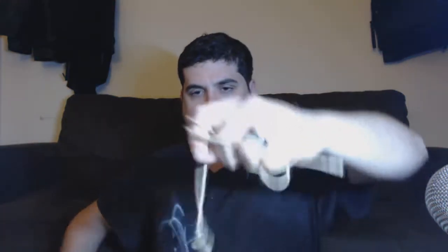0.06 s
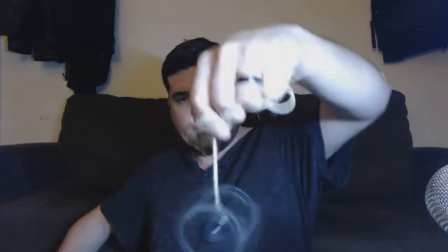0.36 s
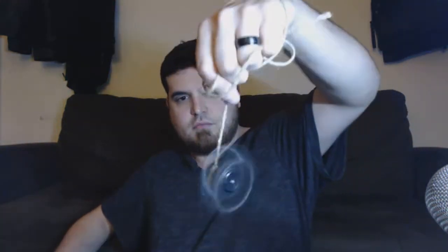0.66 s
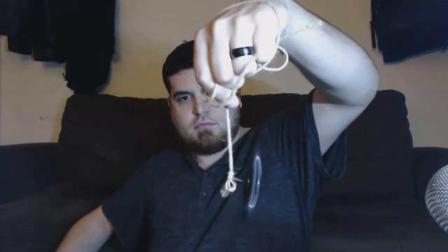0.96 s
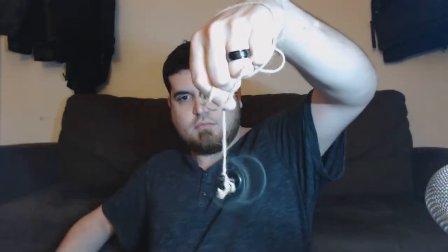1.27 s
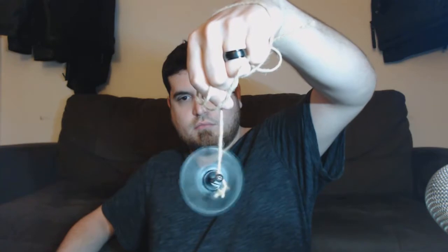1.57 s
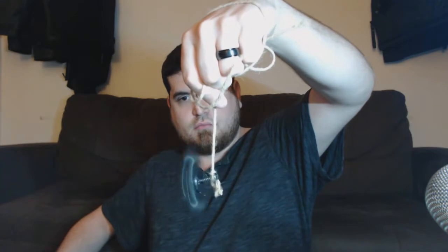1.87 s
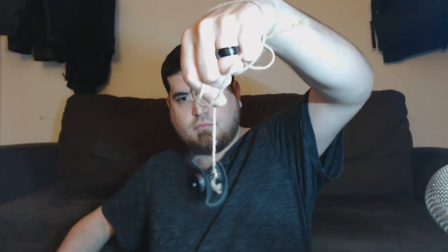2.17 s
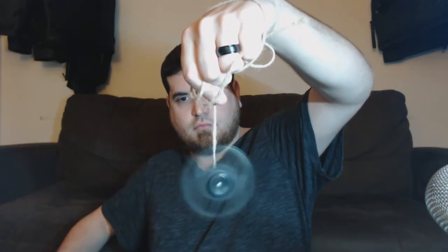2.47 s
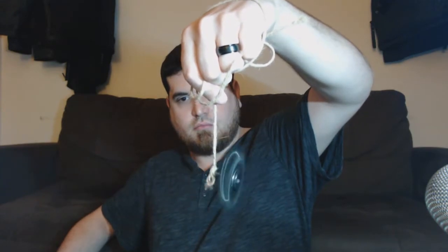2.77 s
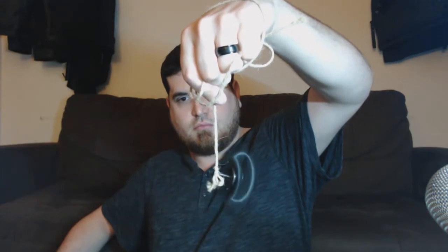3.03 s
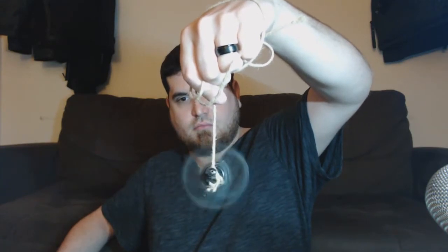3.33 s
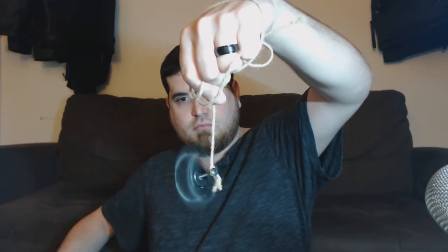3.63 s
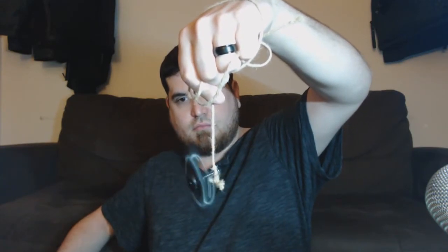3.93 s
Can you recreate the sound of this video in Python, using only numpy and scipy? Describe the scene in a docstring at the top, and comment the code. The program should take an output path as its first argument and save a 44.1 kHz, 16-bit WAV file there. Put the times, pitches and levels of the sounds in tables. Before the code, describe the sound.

A fidget spinner spins fast on a string close to the microphone, its dry bearing giving a bright, fluttering hiss and ring. It rattles harder twice and slows slightly, over a low machine hum in a quiet room.

```python
"""A bright, fluttering hiss and ring, close to the microphone: a fidget spinner on a string, spinning
fast and slowly losing speed. Countless tiny impacts in its dry ball bearing ring the race, cage, balls,
rotor and frame, pulsing with every turn. It rattles harder as it twists on the string; balls knock and
grit ticks. Behind it, machines hum low in a quiet room."""
import sys
import numpy as np
from scipy import signal
from scipy.fft import rfft, irfft, next_fast_len
from scipy.io import wavfile
from scipy.ndimage import map_coordinates

SR = 44100
rng = np.random.default_rng(int(sys.argv[2]) if len(sys.argv) > 2 else 0)


def waveform_to_disk(signal):
    """Save audio, clipped to [-1, 1], as 16-bit WAV at the path in sys.argv[1]."""
    frames = np.transpose(np.atleast_2d(signal))
    scaled = np.clip(frames, -1, 1) * 32767
    samples = np.round(scaled).astype(np.int16)
    wavfile.write(sys.argv[1], SR, samples)


N = 176400
TIME_S = np.arange(N) / SR

# how hard the balls rattle, as the level of the race's ring: time_s, level_db
RATTLE = [(0, -60), (0.12, -53), (0.22, -56), (0.45, -52.5), (0.63, -49), (0.69, -51), (0.74, -47),
          (0.88, -45.5), (1.18, -51), (1.3, -57), (1.72, -53), (2.25, -55.5), (2.6, -51), (2.75, -50.5),
          (2.92, -49), (3.25, -57), (3.58, -55.5), (4, -58)]
# the ring's pitch as the spinner twists; modes follow its ratio to the mean: time_s, pitch_hz
TWIST_PITCH = [(0, 6000), (.25, 6420), (.62, 6100), (.78, 6450), (1.25, 6250), (1.7, 6330), (2.3, 6623),
               (2.65, 6440), (2.95, 6270), (3.3, 6220), (4, 6360)]
# rhythms of the turn, its two tight spots, the cage, the passing balls: depth_db, first_peak_turns
FLUTTER = [(1, 0.68), (0.98, 0.37), (0.48, 0.048), (0.86, 0.2)]


def ball_load(chatter_db, rattle_chatter):
    """Load on the balls in dB: rhythms tied to the turning plus chatter, deeper when they rattle."""
    beats_per_turn = [1, 2, 1.375, 4.333]  # rate of each FLUTTER rhythm: beats_per_turn
    flutter_db = sum(db * np.cos(2 * np.pi * beats * (turns() - first_peak))
                     for beats, (db, first_peak) in zip(beats_per_turn, FLUTTER))
    rattle_db = curve(RATTLE)
    depth = amp(rattle_chatter * (rattle_db - rattle_db.mean()))
    return (flutter_db + chatter_db * wobble(260)) * depth


def race_ring(load_db):
    """The balls strike the race they roll in: the main ring."""
    race_modes = [(6331, 370, -5.5, 1), (6770, 270, -22.5, 3)]  # race resonances: pitch_hz, width_hz, relative_db, throb_db
    return amp(curve(RATTLE)) * modes(race_modes, load_db, drift=0.85, stray=0.004)


def cage_ring(load_db):
    """The cage that holds the balls rings just above the race."""
    cage_modes = [(7100, 380, 2, -6), (7590, 280, 2, 2.5), (8180, 360, -5.5, 2)]  # cage resonances: pitch_hz, width_hz, relative_db, throb_db
    swell = [(0, -58), (0.1, -58.5), (0.22, -57), (0.5, -62), (0.7, -59), (0.85, -56.5), (1.1, -59),
             (1.35, -61), (1.65, -58), (2.15, -59), (2.5, -62), (2.7, -59.5), (2.95, -59), (3.25, -66),
             (3.6, -58.5), (4, -60)]  # strength of the ring: time_s, level_db
    return amp(curve(swell)) * modes(cage_modes, load_db, drift=0.44, stray=0.008)


def rotor_ring(load_db):
    """The impacts ring the rotor, well below the race."""
    rotor_modes = [(3540, 260, -5.5, 2), (4002, 265, 3.5, 4)]  # rotor resonances: pitch_hz, width_hz, relative_db, throb_db
    swell = [(0, -73), (.1, -74), (.15, -64.5), (.23, -67.5), (.28, -106), (.34, -68), (.43, -71),
             (.6, -63), (.87, -68.5), (1.25, -76.5), (1.65, -65.5), (1.9, -65), (2.1, -69), (2.38, -69),
             (2.6, -67.5), (2.85, -68), (3.22, -76), (3.5, -68), (3.7, -67), (4, -80)]  # strength of the ring: time_s, relative_db
    return amp(curve(swell) - 0.5) * modes(rotor_modes, load_db, drift=0.24, stray=0.0048)


def frame_ring(load_db):
    """The impacts ring the frame, whose pitch follows the twist in full."""
    frame_modes = [(4798, 270, -1, -2.5), (5460, 180, 0.5, -2.5)]  # frame resonances: pitch_hz, width_hz, relative_db, throb_db
    swell = [(0, -74), (.13, -72), (.21, -62), (.27, -59), (.35, -65.5), (.6, -65.5), (.98, -60),
             (1.2, -69), (1.45, -73), (1.62, -63.5), (1.9, -65), (2.25, -68.5), (2.4, -65), (2.6, -64.5),
             (2.9, -65), (3.25, -73), (3.6, -69), (4, -71)]  # strength of the ring: time_s, relative_db
    return amp(curve(swell) - 2.5) * modes(frame_modes, load_db, drift=1.0, stray=0.011)


def ball_ring(load_db):
    """The balls themselves ring, high and bright."""
    ball_modes = [(9810, 610, -1, 2), (14300, 850, -15.5, 3.5)]  # ball resonances: pitch_hz, width_hz, relative_db, throb_db
    swell = [(0, -68), (.22, -69), (.35, -60), (.47, -68), (.62, -61.5), (.85, -63), (1, -67), (1.28, -66),
             (1.6, -67), (1.85, -69.5), (2.1, -67.5), (2.48, -64.5), (2.85, -67), (3.2, -65), (3.6, -71),
             (4, -70)]  # strength of the ring: time_s, relative_db
    return amp(curve(swell) + 0.5) * modes(ball_modes, load_db, drift=0, stray=0.005)


def shimmer(load_db, twist_s=1.918, lobe_db=2.5, first_lobe_s=0.25, fade_db_per_s=0.75):
    """A fading shimmer beams out in four lobes that sweep past the microphone as the spinner twists."""
    shimmer_modes = [(11540, 1380, 0, -0.6)]  # broad resonance: pitch_hz, width_hz, relative_db, throb_db
    beam_db = lobe_db * np.cos(2 * np.pi * 4 * (TIME_S - first_lobe_s) / twist_s)
    level_db = -63.5 + beam_db - fade_db_per_s * TIME_S
    return amp(level_db) * modes(shimmer_modes, load_db, drift=0, stray=0.005)


def rolling_hiss(load_db):
    """The dry balls roll and tap: a broad treble hiss."""
    colour = [(4500, -22.5), (6000, -6.5), (7300, -8.5), (8900, 0), (10000, -8.5), (11500, -2.5),
              (12700, 1), (14000, -1.5), (15700, -1)]  # spectrum of the hiss: frequency_hz, relative_db
    swell = [(0, -71), (.15, -72), (.22, -61), (.35, -60), (.5, -67), (.65, -66), (1, -64.5), (1.4, -65),
             (1.7, -66.5), (2, -69), (2.45, -67), (2.7, -65.5), (2.9, -66), (3.1, -68), (3.5, -71.5),
             (4, -68)]  # strength of the hiss: time_s, relative_db
    return amp(curve(swell) + 4.5) * coloured(impacts(rolling_db=-6.5) * amp(load_db), colour)


def frame_rush(load_db):
    """The rolling sounds through the frame as a duller rush."""
    colour = [(400, -20), (1000, -15), (2200, -17), (3000, -6), (3700, 1), (4400, -0.5), (5600, 0.5),
              (6500, -3.5), (8000, -28.5)]  # spectrum of the rush: frequency_hz, relative_db
    swell = [(0, -65), (0.12, -68.5), (0.22, -61.5), (0.45, -64.5), (0.65, -63.5), (0.88, -64),
             (1.3, -64.5), (1.7, -68), (2.1, -66), (2.4, -64), (2.8, -64.5), (3.2, -69.5), (3.65, -68),
             (4, -65.5)]  # strength of the rush: time_s, relative_db
    return amp(curve(swell) - 2.5) * coloured(impacts(rolling_db=-0.5) * amp(load_db), colour)


def chirps(load_db, centre_hz=6980, fall_hz_per_turn=1100, peak_turns=0.27, half_width_turns=0.29):
    """When the balls rattle hard, one ring slides down in pitch once every turn."""
    from_peak = (turns() - peak_turns + 0.5) % 1 - 0.5
    rattle_db = curve(RATTLE)
    level_db = -51.5 + 2 * (rattle_db - rattle_db.max())
    drive = impacts(rolling_db=2) * amp(load_db) * np.exp(-(from_peak / half_width_turns) ** 2)
    return amp(level_db) * ringing(drive, centre_hz - fall_hz_per_turn * from_peak, width_hz=160)


def low_ring():
    """A lower, rattly ring swells and fades, and drops out briefly several times."""
    low_modes = [(2780, 370, 0, 1)]  # low resonance: pitch_hz, width_hz, relative_db, throb_db
    swell = [(0, -86), (.07, -72), (.13, -94), (.23, -71), (.28, -97), (.34, -72), (.43, -86), (.54, -69),
             (.62, -74), (.7, -77.5), (.8, -88), (2.05, -93), (2.2, -78), (2.3, -85), (2.43, -102),
             (2.52, -80), (2.85, -92), (3.1, -82), (3.6, -89), (4, -83)]  # strength of the ring: time_s, level_db
    return amp(curve(swell)) * modes(low_modes, load_db=0, drift=0.15, stray=0.029)


def knocks():
    """A ball knocks in its cage and rings one rough note for a few milliseconds."""
    strikes = [(0.621, -32, 6270), (0.731, -27.5, 6420), (.773, -32, 6340), (.837, -32, 6370),
               (.884, -46, 6450), (.941, -40, 6310), (1.091, -33.5, 6210), (2.563, -29.5, 6530),
               (2.619, -30.5, 6500), (2.698, -31.5, 6480), (2.760, -34, 6350), (2.800, -36, 7140),
               (2.838, -34, 6270), (2.881, -31, 6240), (2.932, -34, 6270), (2.995, -40, 6310),
               (3.874, -36.5, 6440)]  # harder strikes: peak_s, relative_db, pitch_hz
    out = np.zeros(N)
    for peak_s, db, hz in strikes:
        envelope = amp(db - 5) * spike(peak_s, rise_s=0.0015, fall_s=0.003)
        out += envelope * np.sin(2 * np.pi * hz * TIME_S + 0.8 * wobble(900))
    return out


def grit_ticks():
    """Grit in the race makes small dry ticks."""
    ticks = [(.191, -49), (1.361, -51), (1.599, -43), (2.445, -49), (3.186, -47), (3.875, -43)]  # grains caught in the race: peak_s, level_db
    colour = [(1000, -32), (2500, -25), (4000, -11), (5600, -7), (6600, 12), (7600, -2), (8900, -9),
              (9800, 2), (11600, -14), (15000, -9)]  # spectrum of a tick: frequency_hz, relative_db
    envelope = sum(amp(db) * spike(peak_s, rise_s=0.0005, fall_s=0.0035) for peak_s, db in ticks)
    return envelope * coloured(rng.standard_normal(N), colour)


def blip(peak_s=1.655, half_width_s=0.018, pitch_hz=534, level_db=-71):
    """One faint, short hollow note."""
    envelope = amp(level_db) * np.exp(-((TIME_S - peak_s) / half_width_s) ** 2)
    return envelope * np.sin(2 * np.pi * pitch_hz * TIME_S)


def machine_hum(waver_hz=59.1, unsteady_rad=0.14):
    """Machines hum low in the room; one tone wavers in level."""
    steady = [(90.5, -56.5), (120.5, -72), (79.4, -71.5), (265, -80.5), (17, -75)]  # steady tones: pitch_hz, level_db
    waver = [(0.0, -57), (0.04, -54.5), (1.12, -60.5), (1.47, -70), (1.51, -63), (2.51, -53.5),
             (3.56, -58.5), (3.69, -72), (4.0, -82)]  # strength of the wavering tone: time_s, relative_db

    def tone(hz):
        return np.sqrt(2) * np.sin(2 * np.pi * (hz * TIME_S + rng.random()) + unsteady_rad * wobble(13))
    return sum(amp(db) * tone(hz) for hz, db in steady) + amp(curve(waver) - 0.5) * tone(waver_hz)


def room_tone():
    """The soft rumble of the quiet room."""
    colour = [(15, -19), (25, 8), (31, 3.5), (38, -3.5), (55, 7), (72, -9.5), (110, 3.5), (135, -6),
              (185, -8), (202, -0.5), (216, -11.5), (275, -8.5), (293, -11), (304, -0.5), (320, -14),
              (420, -17), (550, -23), (900, -27.5), (2000, -31.5), (15000, -35.5)]  # spectrum of the rumble: frequency_hz, relative_db
    return amp(-63) * coloured(rng.standard_normal(N), colour)


def dipped(x, half_width_s=0.011, above_hz=334):
    """All but the bass dips for a moment now and then."""
    dips = [(0.12, 18), (0.269, 46), (0.284, 33), (0.425, 22), (.541, 14), (1.121, 15), (1.491, 16),
            (1.651, 15), (2.002, 18), (2.049, 15), (2.281, 19), (2.42, 11), (2.514, 12), (2.86, 23),
            (2.955, 10)]  # brief drops in level: centre_s, depth_db
    dip_db = sum(db * np.exp(-((TIME_S - centre_s) / half_width_s) ** 2) for centre_s, db in dips)
    bass = filtered(x, lambda hz: 1 / (1 + (hz / above_hz) ** 6))
    return bass + (x - bass) * amp(-dip_db)


def turns(start_hz=19.26, slowing_hz_per_s=0.9375):
    """Turns made so far by the slowing spinner."""
    return start_hz * TIME_S - slowing_hz_per_s * TIME_S ** 2 / 2


def impacts(rolling_db, hits_per_s=5500):
    """Tiny impacts of random size over smooth rolling noise."""
    hits = (rng.random(N) < hits_per_s / SR) * rng.standard_normal(N)
    return unit(unit(hits) + amp(rolling_db) * rng.standard_normal(N))


def modes(table, load_db, drift, stray):
    """Impacts ring each mode; it throbs once a turn, drifts in pitch with the twist and strays a little."""
    pitch = curve(TWIST_PITCH)
    throb = np.cos(2 * np.pi * (turns() - FLUTTER[0][1]))
    out = np.zeros(N)
    for hz, width_hz, db, throb_db in table:
        bend = 1 + drift * (pitch / pitch.mean() - 1) + stray * wobble(4.74)
        drive = impacts(rolling_db=-5.5) * amp(load_db + throb_db * throb)
        out += amp(db) * ringing(drive, hz * bend, width_hz)
    return unit(out)


def ringing(drive, hz, width_hz):
    """A resonance of moving pitch, at rms 1."""
    carrier = np.exp(2j * np.pi * np.cumsum(hz) / SR)
    pole = np.exp(-np.pi * width_hz / SR)
    envelope = signal.lfilter([1], np.poly([pole, pole]), drive / carrier)
    return unit((envelope * carrier).real)


def spike(peak_s, rise_s, fall_s):
    """An envelope that rises and falls exponentially."""
    return np.exp(-np.maximum((peak_s - TIME_S) / rise_s, (TIME_S - peak_s) / fall_s))


def amp(db):
    """Decibels to gain."""
    return 10 ** (np.asarray(db) / 20)


def unit(x):
    """Scale to rms 1."""
    return x / np.sqrt(np.mean(x ** 2) + 1e-20)


def curve(rows):
    """One value per sample from (time_s, value) points."""
    return np.interp(TIME_S, *np.transpose(rows))


def wobble(rate):
    """A smooth random curve, rate knots a second."""
    return map_coordinates(rng.standard_normal(int(N * rate / SR) + 4), [np.arange(N) * rate / SR])


def filtered(x, response):
    """x through a filter whose gain is response(hz)."""
    size = next_fast_len(N + SR // 2)
    return irfft(rfft(x, size) * response(np.fft.rfftfreq(size, 1 / SR)), size)[:N]


def coloured(x, points):
    """x shaped by (frequency_hz, relative_db) points, at rms 1."""
    points_hz, db = np.transpose(points)
    return unit(filtered(x, lambda hz: amp(np.interp(np.log(hz + 1), np.log(points_hz), db))))


def scene():
    """The spinner close to one microphone, the room behind it."""
    load_db = ball_load(chatter_db=2.5, rattle_chatter=0.06)
    ring_load_db, frame_load_db, bright_load_db = 0.6 * load_db, 0.58 * load_db, 0.66 * load_db
    treble_load_db = bright_load_db + 2.5 * wobble(90)  # the treble flickers
    rings = race_ring(ring_load_db) + cage_ring(ring_load_db)
    rings += rotor_ring(frame_load_db) + frame_ring(frame_load_db)
    rings += ball_ring(bright_load_db) + shimmer(treble_load_db)
    hiss = rolling_hiss(treble_load_db) + frame_rush(0.88 * load_db)
    rattles = chirps(ring_load_db) + low_ring() + knocks() + grit_ticks()
    room = machine_hum() + room_tone()
    # hiss and room dip briefly; the two lowest rings also drop out at times
    return (rings + rattles + blip() + dipped(hiss + room))[None]


def record(dry, top_hz=15760):
    """The recorder keeps nothing above its band limit."""
    return filtered(dry[0], lambda hz: hz < top_hz)[None]


dry = scene()
out = record(dry)
waveform_to_disk(out)
```